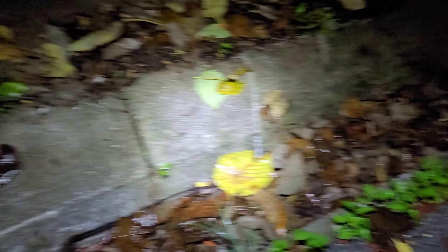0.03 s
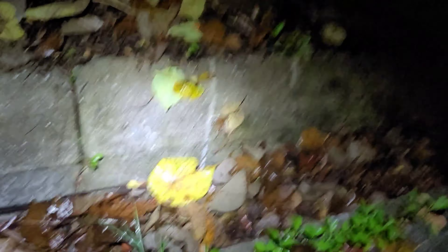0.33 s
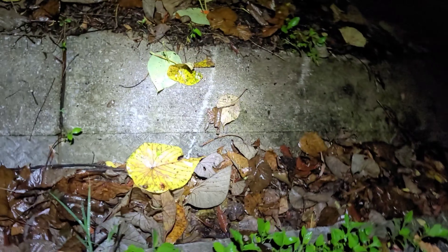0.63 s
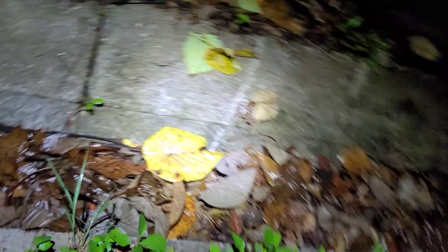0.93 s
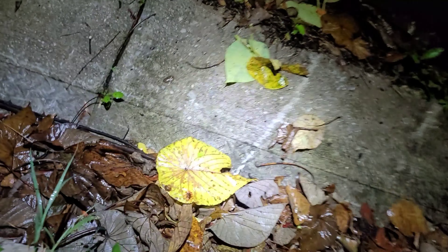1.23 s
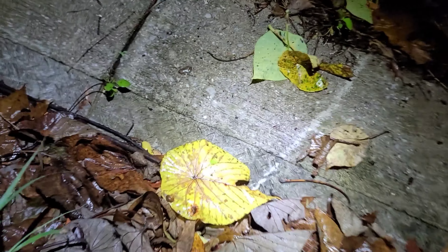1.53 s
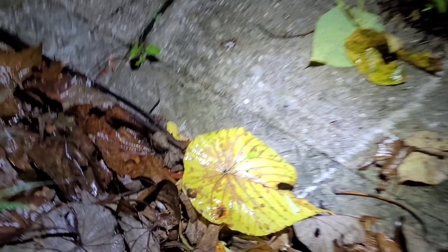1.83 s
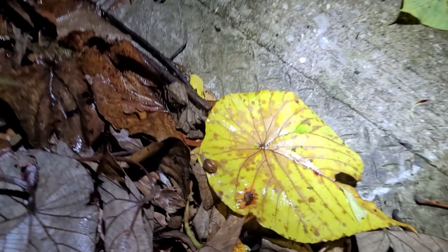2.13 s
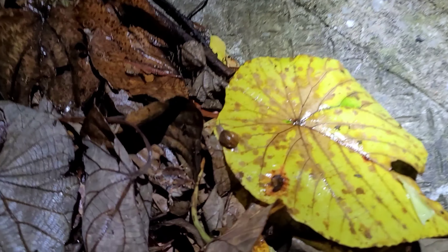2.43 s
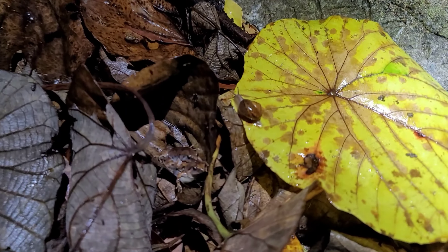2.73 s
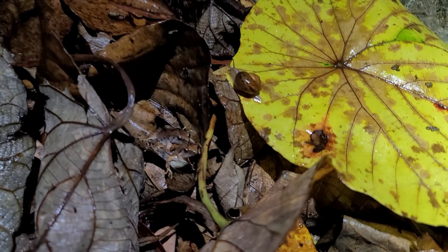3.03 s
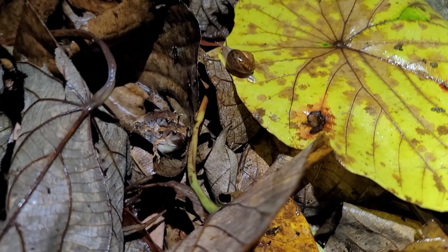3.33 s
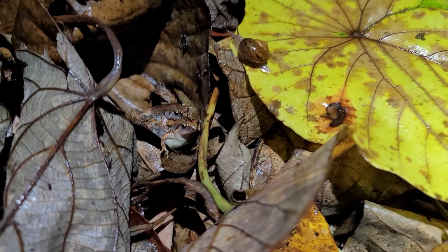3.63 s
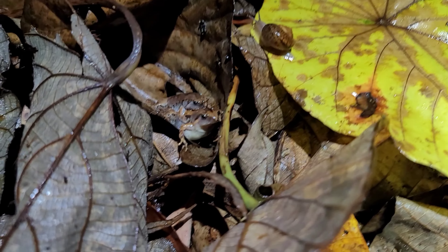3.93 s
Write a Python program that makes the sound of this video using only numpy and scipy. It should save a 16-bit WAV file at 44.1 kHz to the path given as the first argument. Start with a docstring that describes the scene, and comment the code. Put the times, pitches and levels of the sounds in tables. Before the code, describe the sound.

Frogs rattle from just after the start until the end at 4 seconds. Several close ones overlap in half-second runs of rapid, knocking clicks, over a distant clattering chorus. Clear runs stand out near 1 second and 2.3 seconds, with the strongest from 3.3 to 3.7. Soft, dull bumps come at about 1.2 and 1.9 seconds, with faint scuffs, leaf rustles and a low hiss of night air underneath.

```python
"""Wet leaf litter beside a concrete path at night, rattling with a chorus of frogs.
Each close call is a run of knocking pulses, about 17 a second: a throat click and the ring of the
vocal sac, with a wet snap on top, scattered by the surroundings. More frogs clatter further off.
A few soft bumps, scuffs and rustles sit underneath, over a faint hiss of night air."""
import sys
import numpy as np
from scipy import signal
from scipy.fft import rfft, irfft
from scipy.io import wavfile

SR = 44100
rng = np.random.default_rng(int(sys.argv[2]) if len(sys.argv) > 2 else 0)


def store_wav(level_fs):
    """Save 16-bit WAV to argv[1]."""
    pcm = np.round(np.clip(np.atleast_2d(level_fs), -1, 1) * 32767)
    wavfile.write(sys.argv[1], SR, pcm.T.astype(np.int16))


N = 176400
TIME = np.arange(N) / SR

# each close frog's phrasing, a row a pulse: (time [s], sac pitch [Hz], sac level [dB], throat level [dB])
NEAR_PULSES = [(2.2798, 2330, -21.5, -30.5), (2.3432, 2440, -19.5, -28), (2.4048, 2730, -20, -28),
               (2.4655, 2740, -19.5, -28), (2.5268, 2860, -17, -31), (2.5869, 2780, -16.5, -34.1),
               (2.6438, 2870, -16.5, -39.5), (3.2722, 2720, -19, -30), (3.337, 2690, -15.5, -29.5),
               (3.3968, 2680, -15.5, -28), (3.4587, 2681, -14.5, -30), (3.5184, 2660, -14, -32.5),
               (3.5769, 2650, -15, -33), (3.6336, 2690, -16, -36), (3.6841, 2630, -20, -38)]
SHARP_PULSES = [(0.9591, 2560, -21.5, -28), (1.0233, 2700, -18, -26), (1.086, 2700, -18.5, -23.5),
                (1.1465, 2540, -18, -24.5), (1.2068, 2360, -19.5, -26.0), (1.2683, 2560, -21.5, -26.5),
                (1.3261, 2610, -18.5, -30.5)]
LIGHT_PULSES = [(2.7256, 2620, -29, -33.5), (2.7819, 2620, -26, -29), (2.8402, 2580, -25, -25),
                (2.8963, 2580, -23.5, -26), (2.9535, 2590, -23, -25.5), (3.0124, 2590, -22, -29),
                (3.0672, 2690, -24, -31.5), (3.1159, 2710, -26, -34), (3.7422, 2750, -46, -31.5),
                (3.8, 2500, -30.5, -33.6), (3.8458, 2620, -35, -31), (3.9041, 2600, -26, -31),
                (3.9606, 2600, -25.5, -31)]
LEFT_PULSES = [(0.1171, 2500, -25.4, -50), (0.1312, 2230, -34, -24), (0.1404, 2790, -18, -25.5),
               (0.1656, 2570, -17, -31.5), (0.1873, 2830, -22, -26), (0.2177, 2860, -29, -37.9),
               (0.2244, 2650, -18, -25), (0.2469, 2740, -24.5, -30), (0.2837, 2590, -17.5, -24),
               (0.3031, 2520, -28, -54), (0.3288, 2640, -21, -39), (0.3394, 2570, -28, -48),
               (0.537, 2820, -34, -21), (0.5943, 2720, -28, -20.5), (0.6518, 2740, -33, -23),
               (0.6765, 2620, -30, -36), (0.7088, 2770, -35, -22), (0.762, 2420, -26.7, -38),
               (0.7672, 2550, -29, -27), (0.8165, 2640, -26.5, -25.5), (1.0461, 2730, -27.2, -24.5),
               (1.0978, 2545, -17.5, -35), (1.1579, 2605, -22, -30.0), (1.2151, 2730, -21.3, -32),
               (1.2705, 2590, -19.5, -40), (1.3185, 2770, -24, -38.1), (1.3284, 2610, -31, -25.5)]
HUSKY_PULSES = [(1.4125, 2440, -26, -33.2), (1.472, 2427, -22.5, -30.5), (1.5331, 2520, -21.5, -30.5),
                (1.5937, 2580, -20.5, -33.4), (1.6448, 2560, -32.2, -28), (1.6543, 2638, -20, -40),
                (1.7098, 2550, -20.5, -31), (1.7208, 2680, -24.5, -39), (1.7652, 2520, -21.5, -27)]
BRIGHT_PULSES = [(1.7458, 2620, -39, -37), (1.8061, 2450, -36, -37), (1.8233, 2720, -25.5, -27.5),
                 (1.8664, 2440, -25.5, -26.5), (1.8782, 2700, -24.5, -38), (1.9255, 2630, -26, -24.5),
                 (1.9344, 2600, -20.5, -42), (1.9829, 2586, -23, -34), (1.9912, 2630, -19.5, -29),
                 (2.0388, 2440, -21.5, -30), (2.0477, 2620, -20.5, -40), (2.0898, 2460, -22.5, -36),
                 (2.0991, 2700, -20.5, -44), (2.1289, 2530, -31, -49), (2.135, 2740, -24.5, -35),
                 (2.7473, 2460, -25.5, -30.5), (2.807, 2500, -22.5, -29), (2.8641, 2460, -23, -27.5),
                 (2.921, 2450, -23, -38), (2.981, 2470, -20.5, -33), (3.0374, 2480, -24.5, -30),
                 (3.0895, 2450, -24.5, -37), (3.1416, 2540, -29.0, -34), (3.8593, 2500, -25.5, -30),
                 (3.9161, 2530, -28, -43), (3.9751, 2640, -25, -46)]
# the hollow frog's phrasing, sac and throat on one fader: (time [s], pitch [Hz], level [dB])
HOLLOW_PULSES = [(0.4229, 1205, -19), (0.449, 1350, -32), (0.4794, 1260, -18), (0.4895, 1360, -28),
                 (0.5131, 1260, -27), (0.7736, 1340, -21.5), (0.8363, 1326, -17.5), (0.8928, 1350, -19.5),
                 (0.9181, 1300, -29.1), (0.9519, 1350, -21), (0.977, 1375, -27), (0.9882, 1480, -25),
                 (1.0104, 1300, -23), (1.067, 1340, -23.5), (1.1197, 1360, -26.5), (1.5857, 1330, -33),
                 (1.697, 1210, -30), (1.8225, 1290, -24), (1.8369, 1270, -22), (1.891, 1280, -24),
                 (1.9464, 1270, -28), (2.3045, 1240, -26.5), (2.3179, 1205, -28), (2.3628, 1320, -26),
                 (2.3769, 1230, -26), (2.419, 1330, -33), (2.4323, 1214, -26), (2.4865, 1200, -28),
                 (2.817, 1240, -30), (2.8358, 1280, -25), (2.8885, 1190, -43), (3.29, 1230, -25.5),
                 (3.3543, 1270, -25), (3.3652, 1270, -21.5), (3.378, 1260, -37), (3.4128, 1340, -26),
                 (3.4267, 1290, -25), (3.47, 1280, -28), (3.487, 1220, -26), (3.5294, 1340, -32)]
# each frog's timbre, a row a resonance; the first bends with the pulse's pitch:
# (frequency [Hz], level [dB], delay [ms], attack [ms], decay [ms], left over right [dB])
NEAR_VOICE = [(2665, -2.5, 1.5, 1, 1.13, 3.5), (2728, -3.5, 3, 0.17, 0.56, 5.5),
              (2233, 1.5, -1.4, 0.77, 3.4, -11.5), (3040, -6.5, 0.04, 0.42, 0.45, -1),
              (1336, 0, -2, 0.22, 3.1, -2), (1757, -3.5, -2, 0.32, 3.2, -6), (2454, -14, -5, .2, .8, 2),
              (4200, -28, 1.5, 0.18, 1.3, 5)]
SHARP_VOICE = [(2800, -1.5, 2.5, .4, 0.4, 1.4), (2500, 3, 1.5, 0.25, 0.68, 1.4),
               (2600, -3, 0, 0.6, 1.6, -1), (1330, -5.5, 1, 0.29, 2.1, 2.9),
               (1760, 2, -.2, 0.33, 0.36, 1.4), (4470, -27, -0.8, 0.19, 0.66, 0)]
LIGHT_VOICE = [(2628, 0.5, -0.047, 0.3, 2.45, 1), (3085, -14.5, -0.2, 0.39, 1.8, 2.8),
               (1280, -1.5, -1.23, 0.78, 0.94, 0), (1750, 2, -0.55, 0.18, 0.62, 0),
               (4070, -20.5, -.6, 0.23, 1.1, 0)]
HOLLOW_VOICE = [(1217, -1, -0.11, 0.39, 2.2, -1.3), (1480, -12, -0.69, .3, .9, -0.087),
                (2493, -12.5, 0.06, 0.22, 1.8, 1)]
LEFT_VOICE = [(2621, -1, 0.28, 0.1, 3.6, 2), (2954, -16.5, -0.52, 0.75, 1.5, 17),
              (1371, -3, -0.51, 0.1, 1.46, -4.5), (1773, -0.5, -0.51, 0.17, 0.3, 0),
              (4520, -33.5, 0.13, .15, 1.06, 7)]
HUSKY_VOICE = [(2550, -4.5, 0.15, 0.24, 1.4, 3), (2900, -12, 0.46, 0.24, 0.88, 2),
               (1210, 0.5, -0.66, 0.33, 2.15, 0), (1760, -2, 0.048, 0.26, 1.1, -4),
               (4100, -27, -.4, 0.18, 1.0, -6)]
BRIGHT_VOICE = [(2560, -0.5, -0.02, 0.12, 1.5, 5), (2840, -12, -0.24, 0.53, 0.53, -13),
                (1300, -1, -0.013, 0.11, 1.3, -4), (1890, -1, -0.43, 0.11, 0.57, -4),
                (4350, -20.5, -0.1, 0.088, 0.89, 4)]
# fader rides of the distant chorus: (time [s], high sacs [dB], deep sacs [dB], throats [dB])
CHORUS_RIDES = [(.11, -36.5, -40, -48.5), (0.252, -45.5, -40, -50.5), (.38, -40.5, -44.5, -51),
                (.46, -52.5, -41.5, -45), (.62, -45.5, -40, -42.5), (.79, -39, -38, -48.5),
                (.9, -48.5, -46.5, -50.5), (1.05, -43, -45, -44.5), (1.29, -37, -48, -52),
                (1.432, -49.5, -50, -51.5), (1.6, -49.5, -42.5, -47.5), (1.85, -41.5, -41, -46.5),
                (2.08, -46.5, -44.5, -51.5), (2.25, -51.5, -55, -56), (2.38, -37.5, -46, -44),
                (2.62, -39, -47.5, -51), (2.75, -42.5, -50.5, -52.5), (2.87, -77, -47, -46.5),
                (3.08, -41.5, -43.5, -52.5), (3.238, -55, -44.5, -53), (3.41, -42, -62, -44),
                (3.62, -38.5, -43, -48), (3.78, -44, -47, -54.5), (4.0, -52.5, -43.5, -48.5)]
# soft bumps: (time [s], thud pitch [Hz], thud level [dB], knock level [dB])
BUMPS = [(0.197, 130, -55, -52.5), (.545, 221, -53, -51.5), (0.766, 80, -58, -57), (1.218, 88, -43, -41),
         (1.894, 84, -46, -35), (1.909, 84.7, -54, -47), (1.936, 85, -68, -53)]
# friction strokes: (peak time [s], half-width [s], level [dB])
SCUFFS = [(0.196, 0.007, -61), (.764, .004, -53.5), (.783, 0.016, -55.5), (0.55, 0.42, -62),
          (1.2, 0.27, -73), (2.41, 0.43, -61)]  # on wet ground
RUSTLES = [(.5, .06, -60), (.72, 0.04, -57.5), (1.52, 0.11, -58), (2.42, 0.21, -62), (2.62, 0.11, -70.5)]
# tone colour of the noisy layers: (frequency [Hz], level [dB])
SNAP_EQ = [(900, 2), (1500, 8), (4500, 4), (6000, -11), (9000, -17.5), (12200, -7.5), (14000, -22),
           (16000, -32)]  # the wet edge of a pulse
HIGH_SAC_EQ = [(1000, -55), (1700, -30), (2300, -24), (2550, 7), (2750, 4.5), (3000, -5), (3500, -23.5),
               (4500, -21.5), (5500, -33.5), (8000, -57), (12000, -42.5), (16000, -57)]
DEEP_SAC_EQ = [(1000, -35), (1700, -14.5), (2050, -9), (2250, -2), (2430, 4), (2650, -12), (3400, -17.5),
               (4400, -20), (5500, -36.5), (8000, -40), (16000, -100)]
THROAT_EQ = [(500, -19), (850, -34), (1020, -12.5), (1180, 0.5), (1400, -2), (1700, -4), (2200, -6),
             (3500, -37.5)]
KNOCK_EQ = [(60, -21), (160, 4.5), (250, 4), (350, 6.5), (440, 4), (560, -3), (800, -9), (1200, -40)]
SCUFF_EQ = [(1000, 13), (3000, -27), (6000, 10), (9000, 1.5), (12000, 3), (15500, -6)]
RUSTLE_EQ = [(100, -10), (250, -6.5), (370, 5.5), (580, -1), (850, -8), (1500, -23)]  # dull, mostly low mids
AIR_EQ = [(20, -40), (40, -12.5), (65, 7), (110, -3), (200, -7), (350, -8.5), (700, -8.5), (2000, -15),
          (6000, -18.5), (9000, -44), (12000, -19), (15500, -56.5)]

THROAT_BELOW_HZ, VOICE_LOW_CUT_HZ, MODE_DETUNE, SNAP_DECAY_S = 2370, 892, 0.021, 0.005
FAR_PULSES_PER_S, FAR_SPREAD_DB, FAR_LEAD_MS, FAR_LEAD_SPREAD_MS = 220, 2.5, 0.42, 0.14
KNOCK_DECAY_S, THUD_DELAY_S, THUD_DECAY_S = 0.0039, 0.0077, 0.0075
ECHOES_PER_S, ECHO_T60_S, ECHO_START_S = 2500, 0.15, 0.004
AIR_DB, START_S, HIGH_CUT_HZ = -64.5, 0.111, 15700


def frog(pulses, voice, left_lead_ms, echo_db, snap_db=-29):
    """Each pulse rings throat and sac for a few milliseconds and reaches one ear first."""
    call = np.zeros((2, N))
    snap = noise(SNAP_EQ) * panned(0.5)
    mean_pitch_hz = np.mean([pulse[1] for pulse in pulses])
    for onset, pitch_hz, sac_db, throat_db in pulses:
        span = np.flatnonzero(abs(TIME - onset) < 0.03)
        t = TIME[span] - onset
        ear_ms = 1000 * t + np.array([[left_lead_ms], [-left_lead_ms]]) / 2
        for mode, (hz, db, delay, attack, decay, pan_db) in enumerate(voice):
            level = from_db(db + (throat_db if hz < THROAT_BELOW_HZ else sac_db))
            tuning = pitch_hz / mean_pitch_hz if mode == 0 else 1 + MODE_DETUNE * rng.normal()
            ring = np.sin(2 * np.pi * (hz * tuning * ear_ms / 1000 + rng.random()))
            call[:, span] += level * panned(pan_db) * swell(ear_ms - delay, attack, decay) * ring
        snap_envelope = swell(t, SNAP_DECAY_S / 10, SNAP_DECAY_S)
        call[:, span] += from_db(sac_db + snap_db) * snap_envelope * snap[:, span]
    low_cut = signal.butter(4, VOICE_LOW_CUT_HZ, "high", fs=SR, output="sos")
    call = signal.sosfiltfilt(low_cut, call)  # a small body radiates no bass
    return call + from_db(echo_db) * scatter(call)


def distant_chorus():
    """Higher and deeper frogs further off swell and ebb in their sac and throat bands."""
    times, high_db, deep_db, throat_db = np.transpose(CHORUS_RIDES)
    high_sacs = from_db(np.interp(TIME, times, high_db)) * clatter(HIGH_SAC_EQ)
    deep_sacs = from_db(np.interp(TIME, times, deep_db)) * clatter(DEEP_SAC_EQ)
    throats = from_db(np.interp(TIME, times, throat_db)) * clatter(THROAT_EQ)
    return from_db(-1) * (high_sacs + deep_sacs) * panned(-1.3) + throats


def clatter(eq):
    """Distant pulses arrive at random, left ear first, in a wash of echoes."""
    onsets = np.flatnonzero(rng.random(N) < FAR_PULSES_PER_S / SR)
    accent, bearing = rng.standard_normal((2, N))[:, onsets]
    polarity = rng.choice([-1, 1], N)[onsets]
    strength = from_db(FAR_SPREAD_DB * np.clip(accent, -2, 1)) * polarity
    right_lag = ((FAR_LEAD_MS + FAR_LEAD_SPREAD_MS * bearing) * SR / 1000).astype(int)
    clicks = np.zeros((2, N))
    clicks[0, onsets] = strength
    clicks[1, (onsets + right_lag) % N] = strength
    return coloured(clicks + scatter(clicks), eq)


def scatter(sound):
    """A short tail of small echoes off kerb, leaves and trunks, different for each ear."""
    t = TIME[:SR // 2]
    echoes = rng.standard_normal((2, len(t))) * (rng.random((2, len(t))) < ECHOES_PER_S / SR)
    echoes *= (t > ECHO_START_S) * from_db(-60 * t / ECHO_T60_S)
    echoes /= np.sqrt((echoes ** 2).sum(1, keepdims=True))
    return signal.fftconvolve(sound, echoes, axes=1)[:, :N]


def bumps():
    """Each bump is a dull knock with a low thud just behind it."""
    hits = np.zeros((2, N))
    knock = noise(KNOCK_EQ, likeness=0.48)
    for onset, thud_hz, thud_db, knock_db in BUMPS:
        t = TIME - onset
        thud = np.sin(2 * np.pi * thud_hz * t)
        hits += from_db(knock_db) * swell(t, KNOCK_DECAY_S / 5, KNOCK_DECAY_S) * knock
        hits += from_db(thud_db) * swell(t - THUD_DELAY_S, THUD_DECAY_S / 4, THUD_DECAY_S) * thud
    return hits


def rubbing(strokes, eq, likeness):
    """Friction noise fades in and out with each stroke."""
    envelope = sum(from_db(db) * np.exp(-((TIME - peak) / width) ** 2 / 2) for peak, width, db in strokes)
    return envelope * noise(eq, likeness)


def night_air():
    """A faint, steady bed of wide hiss."""
    return from_db(AIR_DB) * noise(AIR_EQ, likeness=0.31)


def noise(eq, likeness=0):
    """Coloured stereo noise; likeness runs from 0 (wide) to 1 (mono)."""
    mid, side = rng.standard_normal((2, N))
    return coloured(np.sqrt(1 + likeness) * mid + np.sqrt(1 - likeness) * side * [[1], [-1]], eq)


def coloured(sound, eq):
    """Shape a sound with an EQ curve and bring it to an rms of 1."""
    hz, db = np.transpose(eq)
    bin_hz = np.maximum(np.arange(N // 2 + 1) * SR / N, 1)
    gain = from_db(np.interp(np.log(bin_hz), np.log(hz), db))
    shaped = irfft(rfft(sound) * gain, N)
    return shaped / np.sqrt(np.mean(shaped ** 2) + 1e-20)


def swell(t, attack, decay):
    """Rounded envelope that grows and dies exponentially, peaking at 1 when t = 0."""
    log_flanks = np.logaddexp(np.log(attack) - t / attack, np.log(decay) + t / decay)
    return (attack + decay) * np.exp(-log_flanks)


def panned(db):
    """Stereo gains that put the left side db above the right."""
    return from_db(np.array([[db], [-db]]) / 2)


def from_db(db):
    """Decibels to gain."""
    return 10 ** (np.asarray(db) / 20)


def scene():
    """Seven frogs up front, the chorus behind them, then small movements and the night air."""
    hollow_pulses = [(onset, hz, db, db) for onset, hz, db in HOLLOW_PULSES]
    frogs = (frog(NEAR_PULSES, NEAR_VOICE, left_lead_ms=-0.096, echo_db=-9, snap_db=-25.5)
             + frog(SHARP_PULSES, SHARP_VOICE, left_lead_ms=0.2, echo_db=-4, snap_db=-22)
             + frog(LIGHT_PULSES, LIGHT_VOICE, left_lead_ms=0.32, echo_db=-6)
             + frog(hollow_pulses, HOLLOW_VOICE, left_lead_ms=0.48, echo_db=-16.5)
             + frog(LEFT_PULSES, LEFT_VOICE, left_lead_ms=0.46, echo_db=-8)
             + frog(HUSKY_PULSES, HUSKY_VOICE, left_lead_ms=0.47, echo_db=-2)
             + frog(BRIGHT_PULSES, BRIGHT_VOICE, left_lead_ms=0.47, echo_db=-9.5))
    movement = (bumps()
                + rubbing(SCUFFS, SCUFF_EQ, likeness=0.033) * panned(2.8)
                + rubbing(RUSTLES, RUSTLE_EQ, likeness=0.24))
    return frogs + distant_chorus() + movement + night_air()


def record(dry):
    """The sound cuts in after a moment of silence, with the very top filtered off."""
    high_cut = signal.ellip(10, 0.1, 80, HIGH_CUT_HZ, fs=SR, output="sos")
    return signal.sosfilt(high_cut, dry * (TIME > START_S))


dry = scene()
out = record(dry)
store_wav(out)
```